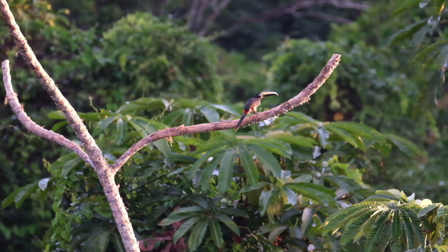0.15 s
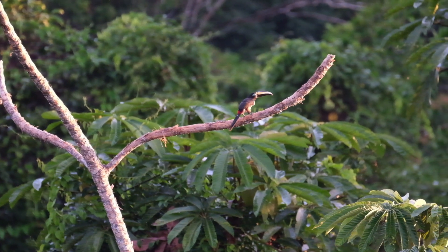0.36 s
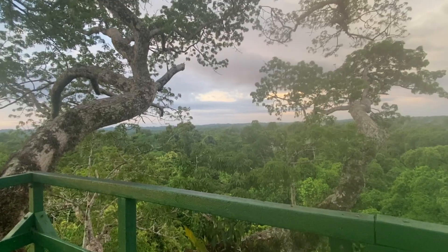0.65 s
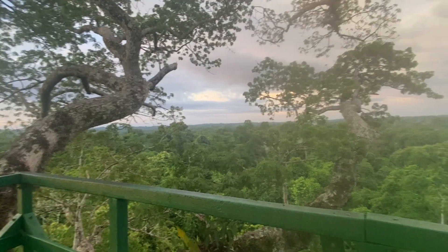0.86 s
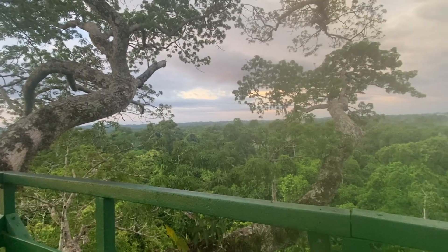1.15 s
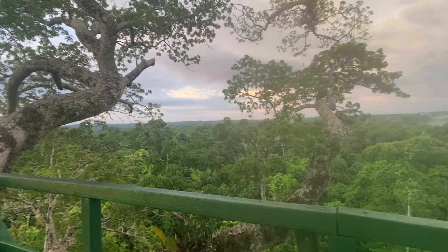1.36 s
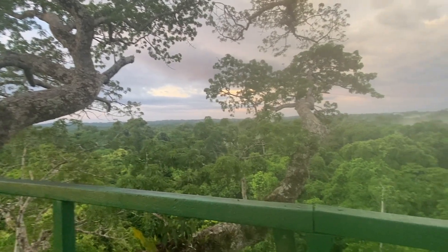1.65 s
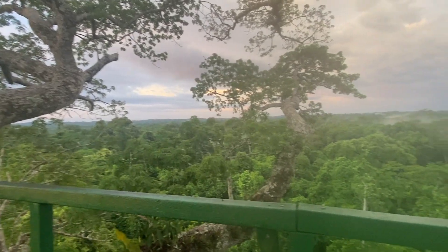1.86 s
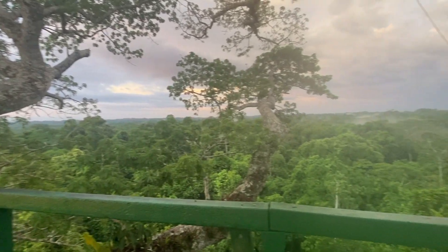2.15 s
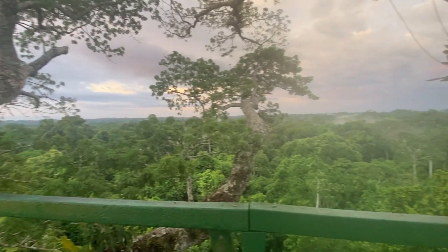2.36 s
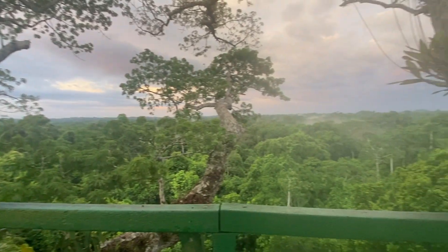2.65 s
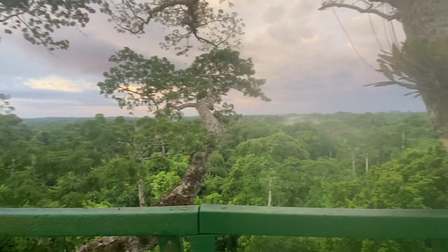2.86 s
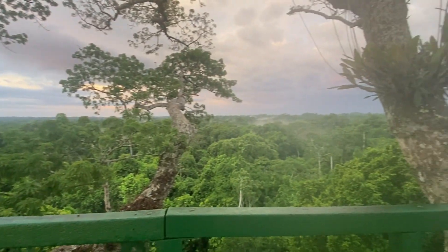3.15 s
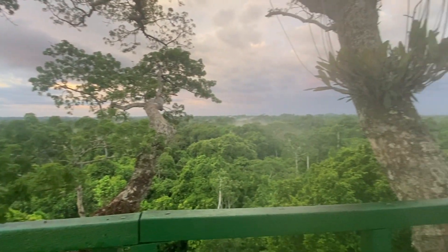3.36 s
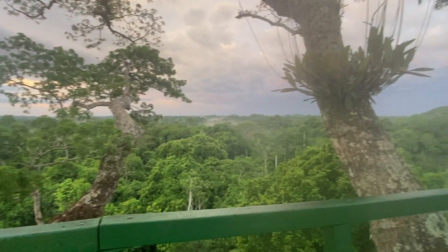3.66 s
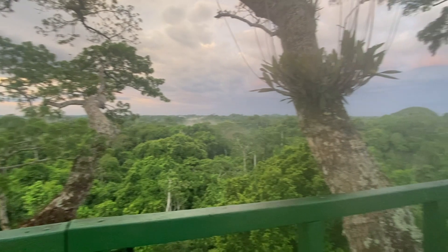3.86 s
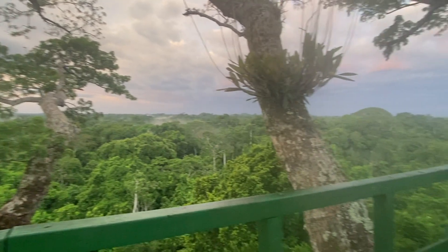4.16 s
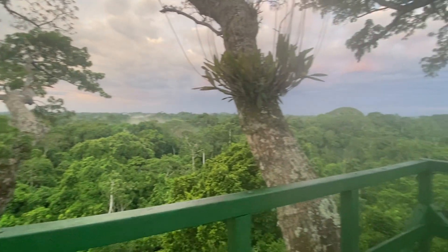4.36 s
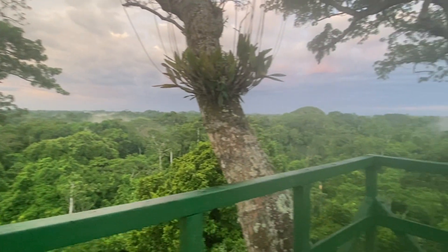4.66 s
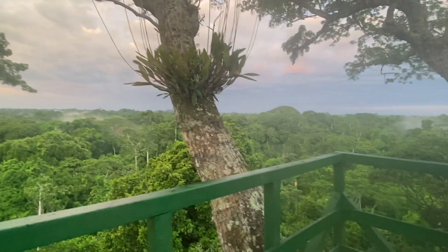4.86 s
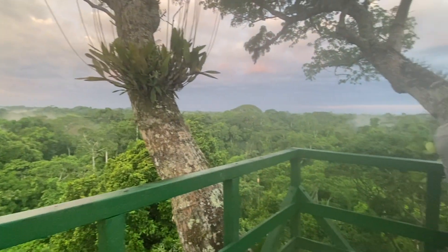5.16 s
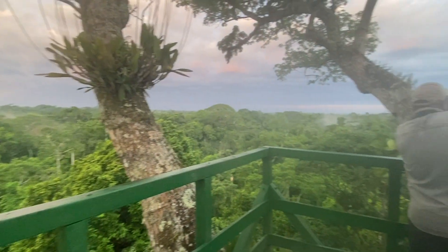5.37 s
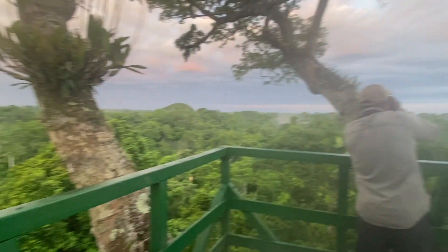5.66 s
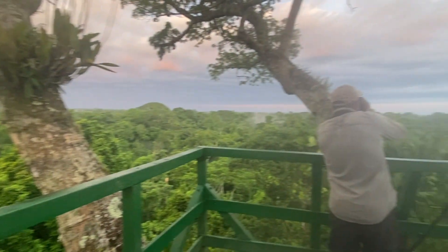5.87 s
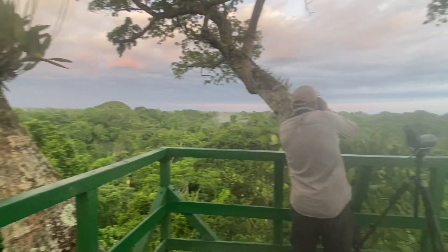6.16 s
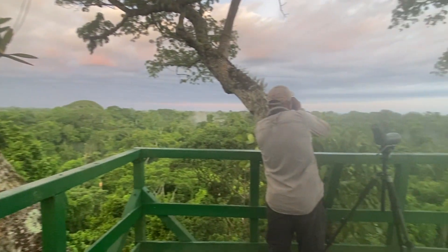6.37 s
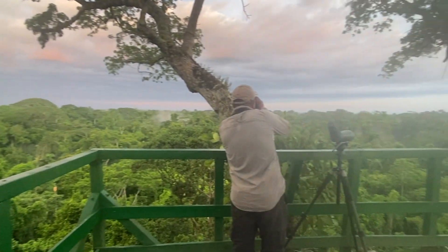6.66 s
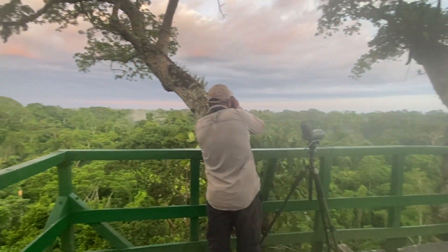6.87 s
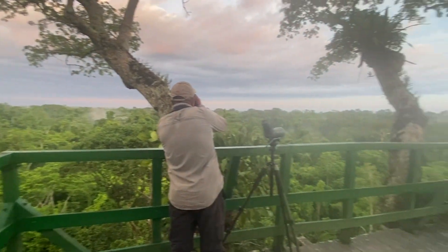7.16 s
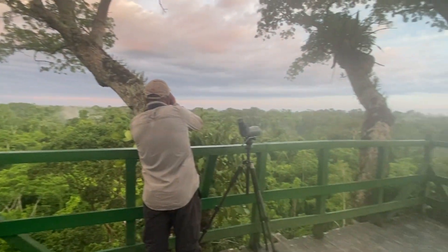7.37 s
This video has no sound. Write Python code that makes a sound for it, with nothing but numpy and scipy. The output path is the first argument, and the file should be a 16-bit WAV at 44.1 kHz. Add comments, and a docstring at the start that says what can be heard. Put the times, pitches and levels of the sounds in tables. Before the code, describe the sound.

Rainforest insects buzz evenly while birds call in clear gliding whistles, over soft handling bumps, rubs and rumble.

```python
"""Rainforest from a canopy tower

Countless insect chirps sum to a dense drone, and a katydid rasps close by, file against scraper.
Birds whistle and hoot in gliding tones that echo from trunks and reverberate in the foliage;
thin rising whistles sweep over the drone. Fingers bump, rub and tap the hand-held camera,
and something hard gives one short scraping knock."""
import sys
import numpy as np
from scipy import signal
from scipy.fft import rfft, irfft, next_fast_len
from scipy.io import wavfile
from scipy.ndimage import uniform_filter1d, map_coordinates

SR = 44100
rng = np.random.default_rng(int(sys.argv[2]) if len(sys.argv) > 2 else 0)


def int16_out(signal):
    """Quantize to a 16-bit WAV file."""
    q = np.round(np.clip(np.atleast_2d(signal).T, -1, 1) * 32767)
    wavfile.write(sys.argv[1], SR, q.astype(np.int16))


N = 330750

# Spectra of the two choruses: (frequency [Hz], relative level [dB])
HIGH_CHORUS = [(2820, -47.5), (4800, -16.5), (4910, -11.5), (5100, -13.5), (5500, -0.5), (6510, 6.5),
               (7220, 4.5), (7630, -4), (7910, -24), (8200, -35), (10700, -79), (18000, -120)]
LOW_CHORUS = [(3300, -57), (3850, -31), (4150, 10), (4650, 12.5), (5000, -5.5), (5600, -39.5)]


def insect_chorus(high_db=-54, low_db=-68.5):
    """Stationary noise: two bands of insect song drone at a nearly steady level."""
    high = amp(high_db + 0.25 * wobble(14)) * swarm(HIGH_CHORUS, alike=0.12, patchy_db=2.0)
    low = amp(low_db + 0.37 * wobble(8.9)) * swarm(LOW_CHORUS, alike=0.22, patchy_db=4.5)
    return high * pan(3.24) + low


def swarm(spectrum, alike, patchy_db):
    """Incoherent summation: countless brief chirps, each at its own pitch, merge into a band."""
    cells = signal.stft(noise(alike), nperseg=1024)[2]
    chirps = uniform_filter1d(rng.standard_normal(cells.shape[1:]), size=2, axis=0)
    chirps = uniform_filter1d(chirps, size=6, axis=1)
    patchy = signal.istft(cells * amp(patchy_db * unit(chirps)), nperseg=1024)[1]
    return coloured(patchy[:, :N], spectrum)


# Cricket songs: (start [s], end [s], centre [Hz], bandwidth [Hz], level [dB])
CRICKETS = [(.4, 7.6, 5666, 62, -69), (.4, 7.6, 6713, 80, -71.5), (5.45, 5.95, 4222, 18, -66),
            (4.95, 5.3, 4140, 16, -73), (1.9, 5, 4090, 97, -77), (5.8, 7.6, 3480, 380, -74),
            (.4, .655, 3300, 130, -74)]


def crickets(swell_db=1.8, fade_s=0.055):
    """Resonance: each single cricket sings in a narrow band about its own pitch."""
    t, out = clock(), np.zeros((2, N))
    for start, end, centre, width, db in CRICKETS:
        song = unit(filtered(noise(0.27), lambda hz: 1 / (1 + (2 * (hz - centre) / width) ** 2)))
        gate = np.clip(np.minimum(t - start, end - t) / fade_s, 0, 1)
        out += amp(db + swell_db * wobble(9.7)) * song * gate
    return out


# Bouts of wing strokes: (time [s], strokes, period [s], level [dB], distance [0-1])
BOUTS = [(0.446, 4, 0.15, -66, 0.5), (1.036, 3, 0.13, -53, 0.2), (3.135, 1, .14, -71, .5),
         (3.63, 2, .155, -71, 0.86), (4.154, 3, .155, -74.5, 0.8), (4.928, 3, 0.14, -73.5, 0.4)]
# Spectrum of the rasp: (frequency [Hz], relative level [dB])
RASP = [(8000, -40), (9700, -1), (12000, 6.5), (13300, -6), (14500, 6.5), (15700, -1)]


def katydid(rise_s=0.009, fall_s=0.0105, tooth_hz=800, spread_db=1.5):
    """Stridulation: each wing stroke drags a file over a scraper; far bouts are uneven and echo more."""
    t = np.arange(-SR // 10, SR // 10) / SR
    swell = np.exp(1 - np.hypot(np.where(t < 0, t / rise_s, t / fall_s), 1))
    near, far = np.zeros((2, N))
    for s, count, period, db, distance in BOUTS:
        for k in range(round(count)):
            stroke = amp(db + spread_db * distance * rng.standard_normal()) * swell
            add(near, s + k * period + t[0], (1 - distance) * stroke)
            add(far, s + k * period + t[0], distance * stroke)
    tooth_rate = tooth_hz * (1 + 0.17 * wobble(200))
    teeth = 1 + 0.95 * np.sin(2 * np.pi * np.cumsum(tooth_rate) / SR)
    rasp = coloured(teeth * noise(0.11), RASP)
    return forest(near * rasp, wet_db=-20) + forest(far * rasp, wet_db=-5)


# An arched note and a shorter falling one: (time in call [s], frequency [Hz], relative level [dB])
FIRST_NOTE = [(0, 2040, -21.5), (.012, 2200, -7), (.03, 2325, -3), (.07, 2390, -2.5), (.1, 2425, -4),
              (.119, 2410, -4), (.129, 2330, -11.5), (.142, 2190, -25)]
SECOND_NOTE = [(.165, 2110, -6), (.175, 2290, -10), (.183, 2365, -2.5), (.217, 2352, -4), (.245, 2315, -8),
               (.268, 2250, -5), (0.279, 2090, -22)]
# Calls: (time [s], first note level [dB], second note level [dB])
TWO_NOTE_CALLS = [(.325, -49, -47.5), (0.921, -49, -46.5), (1.519, -45.5, -44.5), (2.134, -41.5, -40.5),
                  (2.788, -44.5, -50)]


def two_note_bird(echo_db=-54, echo_gap_s=0.03):
    """Reflection: close branches roughen each call; the trees answer alike whichever way it is aimed."""
    notes = [(s, db, note) for s, *levels in TWO_NOTE_CALLS
             for db, note in zip(levels, (FIRST_NOTE, SECOND_NOTE))]
    direct = whistle(notes, lead=-.2, waver=0.003, flutter_db=1.9)
    near = forest(direct, wet_db=-22, trunks_db=7, reach=.025)
    delayed = [(s + echo_gap_s, echo_db, note) for s, _, note in notes]
    outward = whistle(delayed, lead=-.2, waver=0.007, flutter_db=2)
    echo = forest(outward, wet_db=0, alike=0.29, trunks_db=-6) - outward
    return (near + echo) * pan(-0.85)


# A lazy S-shaped rise: (time in call [s], frequency [Hz], relative level [dB])
UPSLUR = [(0, 2210, -9), (.018, 2180, 2.5), (0.055, 2215, -1), (.095, 2316, -3.5), (.135, 2435, 2.5),
          (.168, 2460, 7), (.19, 2414, 4)]
# Its calls: (time [s], level [dB])
UPSLUR_CALLS = [(4.457, -68), (4.913, -64.5)]
# One whistle that swells, then sinks: (time [s], frequency [Hz], level [dB])
LONG_WHISTLE = [(5.443, 1720, -65), (5.48, 1930, -67), (5.51, 2030, -63.5), (5.56, 2060, -55.5),
                (5.66, 2007, -62), (5.79, 1990, -69), (5.9, 1915, -61.5), (6.0, 1795, -66),
                (6.065, 1720, -72)]
# Slurred whistles: (time [s], length [s], start [Hz], turn [Hz], end [Hz],
# turning point [share of length], bend [1 straight, 2 arched], level [dB], distance [0-1])
SLURS = [(0.433, 0.39, 2044, 2069, 1734, 0.015, 1.6, -66, 0.8),
         (1.151, 0.14, 2060, 1824, 2110, 0.56, 0.97, -68, 0.69),
         (1.34, 0.2, 2130, 2060, 1774, 0.12, 1.23, -69, 0.95),
         (1.607, 0.029, 2520, 2850, 2780, 0.56, 1.1, -62, 0.2),
         (1.89, 0.13, 1787, 1820, 1930, 0.25, 2.1, -69.5, 0.65),
         (3.122, 0.31, 2405, 2624, 2490, 0.7, 2.5, -63, 0.1),
         (3.201, 0.34, 1980, 1930, 1884, 0.25, 1.6, -84, 1),
         (3.487, 0.048, 2833, 2910, 2980, 0.73, 2.1, -52.5, 0.4),
         (3.517, .22, 2805, 2830, 2220, 0.026, 1.2, -58, 0.41),
         (4.022, 0.16, 2410, 2393, 2124, 0.13, 1.56, -70.5, 0.74),
         (4.633, 0.11, 2470, 2606, 2660, 0.85, 1.2, -74.5, 0.7),
         (5.382, 0.19, 2190, 2194, 2200, 0.37, 3.1, -61, 0),
         (6.122, 0.3, 1977, 2262, 1966, 0.49, 1.45, -74, 0.77),
         (6.42, .2, 2102, 2086, 1890, .15, 1.5, -83, 0.5)]


def slurring_birds():
    """Direct-to-reverberant ratio: the farther the bird, the more its whistle echoes and wavers."""
    near = whistle([(s, db, UPSLUR) for s, db in UPSLUR_CALLS], lead=0.79, waver=0.003, flutter_db=1.3)
    near += whistle([(0, 0, LONG_WHISTLE)], lead=1.63, waver=0.003, flutter_db=1.3)
    far = np.zeros((2, N))
    for s, *shape, db, distance in SLURS:
        note = whistle([(s, db, slur(*shape))], lead=1.63,
                       waver=0.0024 + .012 * distance, flutter_db=1.2 + 2 * distance)
        near += (1 - distance) * note
        far += distance * note
    return forest(near * pan(-2.2), wet_db=-16, trunks_db=-28) + forest(far, wet_db=-1.5)


def slur(length, start_hz, turn_hz, end_hz, turn, bend, edge_db=-4):
    """Power-law glide: the contour of a whistle that is loudest at its turning pitch."""
    u = np.linspace(0, 1, 41)
    turn = np.clip(turn, .02, .98)
    away = np.where(u < turn, (turn - u) / turn, (u - turn) / (1 - turn)) ** bend
    hz = turn_hz + away * (np.where(u < turn, start_hz, end_hz) - turn_hz)
    return np.transpose([u * length, hz, edge_db * away])


# Two voices of a rising whistle: (time in call [s], frequency [Hz], relative level [dB])
LOWER_VOICE = [(0, 7680, -4), (.02, 8060, 2.5), (.075, 8720, 6), (.13, 9340, 1.5), (.19, 9947, -3),
               (.27, 10300, -5), (.33, 10360, -8), (.358, 10940, -11)]
UPPER_VOICE = [(0, 9570, -15), (.07, 10730, -22), (0.202, 11750, -16), (.32, 12450, -22)]
# Its calls: (time [s], level [dB])
RISING_CALLS = [(1.216, -61.5), (3.114, -59.5), (5.289, -61.5), (7.13, -64.5)]


def rising_whistles():
    """Scattering: the foliage spreads a bird's thin two-voiced whistle into a broad hiss."""
    out = np.zeros((2, N))
    for s, db in RISING_CALLS:
        voices = [(s, db, LOWER_VOICE), (s, db, UPPER_VOICE)]
        out += whistle(voices, lead=1.95, waver=0.008, flutter_db=3.3, waver_rate=500)
        scattered = whistle(voices, lead=1.95, waver=0.02, flutter_db=2, waver_rate=500)
        out += forest(scattered, wet_db=-9.5, alike=0, trunks_db=-2, reach=.05) - scattered
    return out * pan(-1.7)


# A bird's chip: (time in call [s], nominal frequency [Hz], relative level [dB])
CHIP = [(0, 8100, -15), (.006, 6850, -0.5), (.017, 5690, 3.5), (.026, 4740, -4.5), (.033, 4180, -16)]
# Its calls: (time [s], level [dB], pitch factor)
CHIP_CALLS = [(2.262, -45, .99), (6.26, -51.5, .98)]


def chips():
    """Frequency sweep: a tone drops about an octave in an instant."""
    notes = [(s, db, np.multiply(CHIP, [1, pitch, 1])) for s, db, pitch in CHIP_CALLS]
    direct = whistle(notes, lead=-1.1, waver=0.025, flutter_db=3, waver_rate=400)
    return forest(direct * pan(-1.7), wet_db=-14, trunks_db=4.5, reach=0.013)


# Far, low hoots: (time [s], length [s], peak frequency [Hz], level [dB])
HOOTS = [(1.223, 0.22, 1286, -70), (1.469, 0.25, 1303, -68.5), (1.88, 0.2, 1241, -68),
         (5.37, 0.28, 557.7, -72.5), (5.869, 0.26, 1245, -66), (6.28, 0.23, 1245, -65),
         (6.35, .15, 1338, -72), (6.49, .2, 1266, -67), (6.68, 0.15, 1248, -68), (6.85, 0.24, 1345, -71),
         (6.95, 0.2, 1210, -65), (7.188, 0.16, 1295, -64.5), (7.35, 0.12, 1330, -64)]


def hooting_bird():
    """Diffuse reflection: arched, wavering hoots trail off among the trees."""
    arches = [(s, db, [(0, hz * .98, -8), (length / 2, hz, 0), (length, hz * .975, -9)])
              for s, length, hz, db in HOOTS]
    direct = whistle(arches, lead=-2.06, waver=0.008, flutter_db=2.5, waver_rate=40)
    return forest(direct, wet_db=-8, alike=0, trunks_db=-8)


def climbing_bird(start_s=6.305, first_hz=1480, first_db=-71.5, note_s=0.11, sag=0.041):
    """Stepped sweep: six sagging hoots climb evenly in pitch and level."""
    step_s, step_hz, step_db = 0.201, 35.8, 1.75
    hoot = lambda hz: [(0, hz, -4), (note_s / 3, hz, 0), (note_s, hz * (1 - sag), -5)]
    notes = [(start_s + k * step_s, first_db + k * step_db, hoot(first_hz + k * step_hz))
             for k in range(6)]
    direct = whistle(notes, lead=-2.1, waver=0.008, flutter_db=3)
    return forest(direct, wet_db=-9, alike=0, trunks_db=-8)


def whistle(notes, lead, waver, flutter_db, fade=0.0021, waver_rate=120):
    """Modulated pure tones: notes (time [s], level [dB], contour); left leads right by lead [rad]."""
    out = np.zeros((2, N))
    for start, db, contour in notes:
        s, hz, level = np.transpose(contour)
        t = np.arange(s[0], max(s[-1], s[0] + .01), 1 / SR)
        pitch = np.interp(t, s, hz) * (1 + waver * wobble(waver_rate, size=len(t)))
        loud = amp(db + np.interp(t, s, level) + flutter_db * wobble(70.3, size=len(t)))
        edges = np.clip(np.minimum(t - t[0], t[-1] - t) / fade, 0, 1)
        phase = 2 * np.pi * np.cumsum(pitch) / SR
        add(out, start + s[0], np.sqrt(2) * loud * edges * np.sin(phase + [[lead / 2], [-lead / 2]]))
    return out


# Bumps of the hand on the camera: (time [s], level [dB], firmness [0-1], life [s])
BUMPS = [(.498, -46, 0.82, 0.011), (0.538, -38.5, 0.18, 0.022), (.675, -41, .2, 0.017),
         (.7, -33.5, 0.81, 0.0078), (.716, -38, 0.37, 0.0058), (.748, -45, 0, .016),
         (.858, -39, 0.26, 0.011), (1.23, -40.5, 0.84, 0.016), (1.262, -39, 0.17, 0.011),
         (1.327, -46.5, 0.75, 0.017), (1.466, -54, 1, .014), (1.527, -45.5, 0.22, 0.02),
         (1.746, -45.5, 0.34, 0.011), (1.832, -49, .6, .012), (2.007, -46, 0.98, 0.019),
         (2.158, -37, 1, 0.017), (2.314, -41, 0.3, 0.0076), (2.42, -37.5, 0.06, 0.019),
         (2.65, -36.5, 0.57, 0.023), (2.709, -31, 0.54, 0.0088), (2.848, -40.5, 0.17, 0.015),
         (2.937, -35, 0.34, 0.011), (3.017, -26, 0.5, 0.012), (3.111, -38, 0.17, 0.067),
         (3.434, -41, 0.68, 0.016), (3.51, -42, 0.43, 0.016), (3.623, -31, 0.17, 0.02),
         (3.751, -40.5, 0.55, 0.016), (3.871, -40.5, 0.18, 0.016), (4.016, -39.5, 0.46, 0.023),
         (4.133, -46, 0, 0.098), (4.357, -40.5, 0.14, 0.034), (4.5, -44.5, 0.72, 0.048),
         (4.572, -33, 0.41, 0.014), (4.79, -46.5, 0.15, 0.022), (4.947, -45, 0.41, 0.027),
         (5.003, -38.5, 0.45, 0.013), (5.912, -35.5, 0.2, 0.014), (5.936, -35.5, 0.85, 0.017),
         (5.982, -32.5, 0, 0.017), (6.05, -48, .2, 0.03), (6.292, -50, 0, 0.022),
         (6.336, -51.5, 0.6, 0.013), (6.656, -52.5, 0.13, 0.043), (6.691, -48, 0.8, 0.014),
         (7.315, -54, 0.85, 0.014), (7.351, -38.5, 0.7, 0.017), (7.379, -42, 0.1, 0.017)]


def hand_bumps():
    """Impact excitation: a firmer bump thuds higher and knocks the case harder."""
    t, out = np.arange(-SR // 8, SR // 5) / SR, np.zeros((2, N))
    for s, db, firmness, life in BUMPS + fidgets():
        thud_hz = np.interp(firmness, [0, 1], [60.1, 127.6])
        case_hz = np.interp(firmness, [0, 1], [140, 238])
        case_db = np.interp(firmness, [0, 1], [-17, 3.3])
        bump = thud(t, thud_hz, life) + amp(case_db) * thud(t, case_hz, life=.007, swing=.17)
        add(out, s + t[0], amp(db) * bump)
    return out


def thud(t, hz, life, swing=0.26, sag=0.25):
    """Damped oscillation: uneven cycles swell, then sink in pitch as they die."""
    pitch = hz * np.exp(swing * wobble(131.3, size=len(t)) - sag * np.tanh(t / life))
    cycles = np.cumsum(pitch) / SR
    phase = 2 * np.pi * (cycles - np.interp(0, t, cycles))
    stereo_skew = 0.65 * wobble(61.7, size=len(t)) * np.array([[1], [-1]])
    return np.cos(phase + stereo_skew) / np.cosh(t / (life * np.where(t < 0, .45, .7)))


# Finger taps: (time [s], level [dB], lowest mode [Hz])
TAPS = [(.697, -47, 327), (1.319, -42, 368), (1.331, -46, 400), (1.999, -39, 334), (2.143, -41, 351),
        (2.154, -41, 328), (2.817, -53, 512), (3.372, -52, 635.4), (3.499, -51, 627), (4.016, -44.5, 341),
        (4.132, -46.5, 507), (4.634, -59, 784), (5.853, -51, 413), (5.928, -43.5, 333), (6.049, -55, 453),
        (6.228, -47.5, 298), (6.326, -47, 285), (6.42, -52.5, 456), (6.683, -43, 360), (6.701, -47.5, 290),
        (6.911, -58, 502), (7.22, -53, 1760), (7.347, -43, 311)]
# Modes of the case: (ratio to lowest mode, relative level [dB], 60 dB decay time [s])
CASE_MODES = [(1, 0.5, 0.047), (1.45, -14, 0.052), (2.05, -14, 0.0082), (3.1, -21, 0.016)]


def finger_taps(attack_s=0.00064):
    """Modal ringing: a tap briefly rings the case, at a pitch that depends on where it lands."""
    t, out = np.arange(SR // 12) / SR, np.zeros((2, N))
    for s, db, hz in TAPS:
        for ratio, mode_db, t60 in CASE_MODES:
            pitch = hz * ratio * (1 + 0.091 * wobble(410, size=len(t)))
            phase = 2 * np.pi * np.cumsum(pitch) / SR + rng.standard_normal((2, 1))
            envelope = amp(db + mode_db - 60 * t / t60) * (1 - np.exp(-t / attack_s))
            add(out, s, envelope * np.sin(phase))
    return out


# Slips on the case: (time [s], level [dB], share of fingernail [0-1])
SLIPS = [(0.703, -51.5, 0.2), (1.334, -52, 0.27), (1.465, -55.5, 0.46), (1.795, -62, 0.73), (2.154, -43, 0),
         (3.433, -50, 0.24), (3.515, -52.5, .2), (4.036, -51, 0.38), (4.155, -52.5, .3), (5.759, -57, 0.18),
         (6.052, -58.5, 0.7), (6.24, -58, 0.23), (6.429, -56.5, 0.93), (6.917, -57.5, 0.94)]
# Spectra of finger pad and nail: (frequency [Hz], relative level [dB])
PAD = [(200, -1.5), (330, 6.5), (500, -6), (900, -11), (2500, -21), (7000, -17), (10500, -37.5),
       (14000, -63)]
NAIL = [(80, -10), (200, 2.5), (450, 2.5), (750, -7), (1100, -6), (1500, -24), (4000, -42), (9000, -75)]


def finger_slips(rise_s=0.014, fall_s=0.023, grain_db=4):
    """Sliding friction: the pad of a finger rubs smoothly, the nail grainily."""
    t, envelopes = np.arange(-SR // 8, SR // 5) / SR, np.zeros((2, N))
    swell = np.exp(-np.abs(t) / np.where(t < 0, rise_s, fall_s))
    for s, db, share in SLIPS:
        add(envelopes, s + t[0], amp(db) * np.outer([1 - share, share], swell))
    pad = coloured(noise(0.12), PAD)
    nail = coloured(amp(grain_db * wobble(300)) * noise(0.34), NAIL)
    return envelopes[0] * pad + envelopes[1] * nail


# Spectra of the knock's dull body and bright scrape: (frequency [Hz], relative level [dB])
THUMP = [(150, 3), (500, 8.5), (900, 8), (1600, 3), (2200, -23), (4000, -43)]
SCRAPE = [(1200, -20), (2000, 3.5), (2450, 11.5), (2850, -1.5), (3400, 1), (4000, -18), (7000, -36)]


def knock(start_s=5.295, attack_s=0.012, release_s=0.016, thump_db=-54.5, scrape_db=-49.5):
    """Stick-slip friction: something hard bumps and skids; the scrape outlasts the thump."""
    t = clock() - start_s
    attack = np.clip(t / attack_s, 0, 1)
    swell = lambda hold_s: attack * np.exp(-np.maximum(t - attack_s - hold_s, 0) / release_s)
    slips = amp(0.54 * wobble(500)) * noise(0.53)
    thump = amp(thump_db) * swell(hold_s=.018) * coloured(slips, THUMP)
    scrape = amp(scrape_db) * swell(hold_s=.03) * coloured(slips, SCRAPE)
    return forest((thump + scrape) * pan(-1.3), wet_db=-40)


# Unrest of the hand: (time [s], level [dB])
UNREST = [(0.6, -56), (1.46, -65.5), (1.56, -63), (2.85, -57), (3.27, -62.5), (4.36, -55), (5.6, -74.5),
          (5.98, -60.5), (7.13, -80), (7.5, -60.5)]
# Spectrum of its rumble: (frequency [Hz], relative level [dB])
RUMBLE = [(20, -36), (38, 2.5), (55, 7), (100, 0), (200, -11), (330, -14.5), (600, -37.5), (1200, -95)]


def hand_rumble(boost_db=2.5):
    """Structure-borne sound: the restless hand shakes the camera."""
    unrest_db, = curves(UNREST)
    return amp(unrest_db + boost_db + 5.9 * wobble(22)) * coloured(noise(1.0), RUMBLE)


def fidgets(count=30, life_s=0.021, boost_db=2, spread_db=3):
    """Random impacts: rows of light, soft bumps, as strong as the hand is restless."""
    when, size, firmness = rng.random((count, 3)).T
    s = when * N / SR
    db = np.interp(s, *np.transpose(UNREST)) + boost_db + spread_db * (2 * size - 1)
    return list(zip(s, db, 0.45 * firmness, np.full(count, life_s)))


# Swells of a high shimmer: (time [s], level [dB])
SHIMMER_SWELLS = [(.65, -92.5), (1.0, -93), (1.55, -101), (1.88, -85.5), (2.7, -97), (3.05, -90),
                  (3.5, -91), (4.05, -99), (4.17, -87.5), (4.44, -87), (4.55, -89), (4.85, -98),
                  (4.95, -87), (5.65, -83.5), (6.2, -92), (7.5, -101)]
# Its spectrum: (frequency [Hz], relative level [dB])
SHIMMER_SPECTRUM = [(9500, -46), (11100, -10), (12100, 6.5), (12900, -25), (13600, -17), (14400, 6),
                    (15000, -4.5), (15700, -11.5)]


def high_shimmer():
    """Amplitude modulation: two thin, very high bands of faint hiss come and go."""
    level_db, = curves(SHIMMER_SWELLS)
    return amp(level_db + 3.2 * wobble(11)) * swarm(SHIMMER_SPECTRUM, alike=0.11, patchy_db=8.5)


# Spectrum of the distant forest: (frequency [Hz], relative level [dB])
HUSH = [(25, 6), (60, 9.5), (250, 9), (500, -3.5), (900, -4), (1800, -3.5), (2200, 2.5), (2800, -8),
        (3700, -4.5), (7300, -28.5), (8200, -38.5), (15700, -32)]


def forest_hush(db=-67, swell_db=2.2):
    """Diffuse field: distant noise arrives nearly uncorrelated left and right."""
    return amp(db + swell_db * wobble(4.52)) * coloured(noise(0.017), HUSH)


# Reverberation of the trees: (frequency [Hz], 60 dB decay time [s])
TREE_DECAY = [(300, 3.3), (2300, 1.43), (5000, 0.21), (8500, 1.05), (10500, 0.78), (12000, 1.2),
              (15000, 0.12)]


def forest(x, wet_db, alike=0.85, trunks_db=-3, reach=.13):
    """Reverberation: trunks return separate echoes spread over reach [s], foliage a diffuse tail."""
    hz, t, cells = signal.stft(noise(alike)[:, :SR * 3 // 2], SR, nperseg=256)
    decay = amp(-60 * t / along(TREE_DECAY, hz)[:, None])
    tail = signal.istft(cells * decay, SR, nperseg=256)[1]
    tail /= np.linalg.norm(tail[0])
    count = 12
    delays = 0.011 + reach * rng.random(count)
    arrivals = (delays * SR).astype(int) + rng.integers(8, size=(2, count))
    for side in range(2):
        tail[side, arrivals[side]] += amp(trunks_db) * rng.choice([-1, 1], count) / np.sqrt(count)
    return x + amp(wet_db) * signal.fftconvolve(x, tail, axes=1)[:, :N]


def amp(db):
    """Decibels to gain."""
    return 10 ** (np.asarray(db) / 20)


def unit(x):
    """Scale to rms 1."""
    return x / np.sqrt(np.mean(x ** 2) + 1e-20)


def clock():
    """The time of every sample."""
    return np.arange(N) / SR


def along(points, hz):
    """(Hz, value) points on a log axis."""
    f, v = np.transpose(points)
    return np.interp(np.log(hz + 1), np.log(f), v)


def curves(rows):
    """One value per sample for each column after the time."""
    s, *cols = np.transpose(rows)
    return [np.interp(clock(), s, c) for c in cols]


def wobble(rate, size=N):
    """A smooth random curve, rate knots a second."""
    return map_coordinates(rng.standard_normal(int(size * rate / SR) + 4), [np.arange(size) * rate / SR])


def filtered(x, response):
    """x times a response of frequency."""
    m = next_fast_len(N + 8192)
    return irfft(rfft(x, m) * response(np.fft.rfftfreq(m, 1 / SR)), m)[..., :N]


def coloured(x, spectrum):
    """x shaped by (Hz, dB) points, at rms 1."""
    return unit(filtered(x, lambda hz: amp(along(spectrum, hz))))


def noise(alike):
    """Stereo white noise with a given left-right correlation."""
    turn = np.arccos(np.clip(alike, -1, 1)) / 2
    mid, side = rng.standard_normal((2, N)) * [[np.cos(turn)], [np.sin(turn)]]
    return np.array([mid + side, mid - side])


def pan(left_db):
    """Gains of the two channels."""
    return amp([[left_db / 2], [-left_db / 2]])


def add(track, s, sound):
    """Mix a sound into the track at a time."""
    i = max(round(s * SR), 0)
    track[..., i:i + sound.shape[-1]] += sound[..., :max(N - i, 0)]


def scene():
    """Superposition: insects, forest, birds and handling sounds add at the tower."""
    drone = insect_chorus() + crickets() + forest_hush()
    treble = katydid() + high_shimmer()
    birds = two_note_bird() + slurring_birds() + hooting_bird() + climbing_bird()
    high_birds = rising_whistles() + chips()
    handling = (hand_bumps() + finger_slips() + hand_rumble()) * pan(0.71) + finger_taps()
    return drone + treble + birds + high_birds + handling + knock()


def record(dry, onset_s=0.4385, cutoff_hz=15750):
    """Gating and band limiting: the sound sets in abruptly and holds nothing above the cutoff."""
    return filtered(dry * (clock() > onset_s), lambda hz: hz < cutoff_hz)


dry = scene()
out = record(dry)
int16_out(out)
```